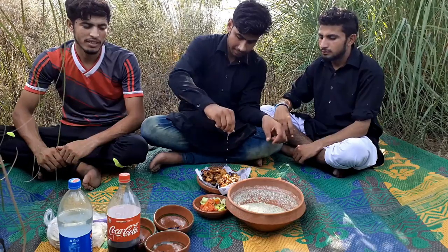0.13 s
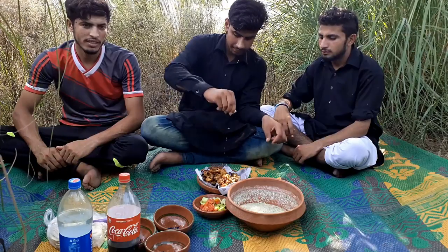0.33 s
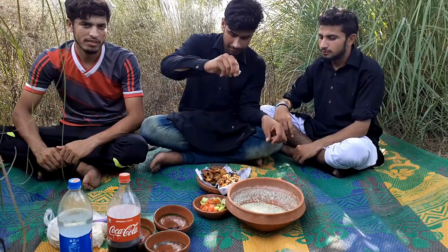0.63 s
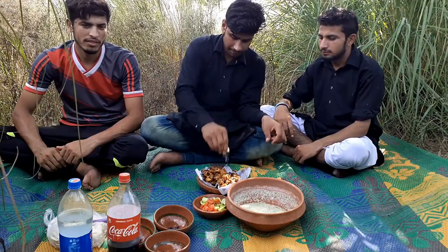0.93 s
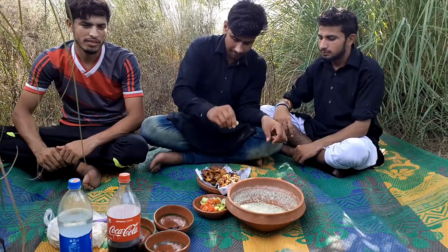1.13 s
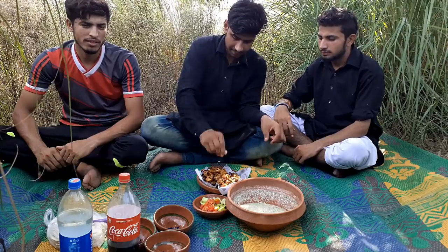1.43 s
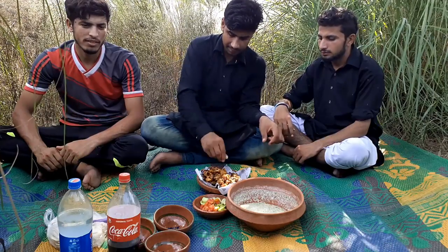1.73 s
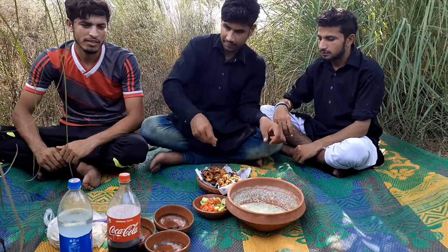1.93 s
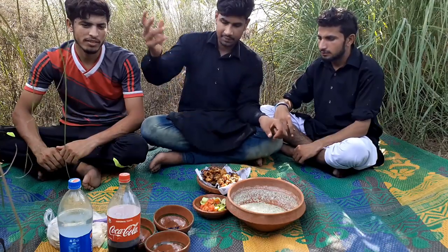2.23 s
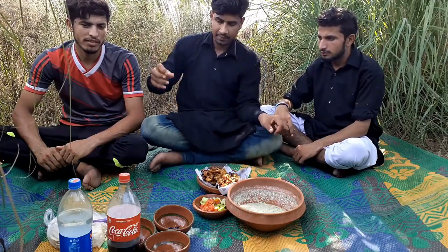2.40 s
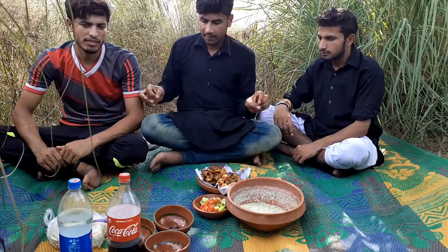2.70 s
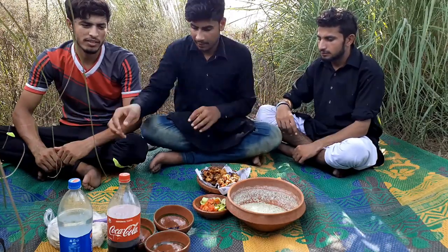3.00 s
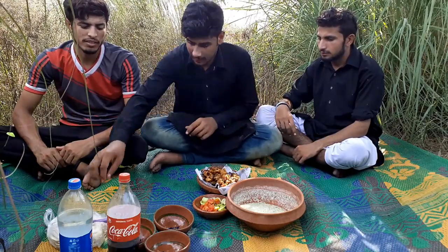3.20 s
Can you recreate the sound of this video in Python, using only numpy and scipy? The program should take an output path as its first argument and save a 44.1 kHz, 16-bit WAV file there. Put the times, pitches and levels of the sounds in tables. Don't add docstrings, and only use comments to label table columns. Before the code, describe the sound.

Two rough crow caws about two seconds apart, with a far single-cylinder engine chugging behind.

```python
import sys
import numpy as np
from scipy import signal
from scipy.fft import rfft, irfft
from scipy.io import wavfile
from scipy.ndimage import uniform_filter1d

SR = 44100
rng = np.random.default_rng(int(sys.argv[2]) if len(sys.argv) > 2 else 0)


def volts_from_decibels(level):
    exponent = np.asarray(level, float) / 20
    return 10 ** exponent


def inscribe(sig):
    pcm = np.round(np.clip(np.atleast_2d(sig).T, -1, 1) * 32767)
    wavfile.write(sys.argv[1], SR, pcm.astype(np.int16))


N = 147735

# (time [s], level [dB], pitch [Hz], beak opening [scale of the resonances])
FIRST_CAW = [
    (0, -37, 520, 1.0),
    (.04, -32, 505, 1.02),
    (.17, -30, 505, 1.0),
    (.23, -31.5, 472, .98),
    (.33, -33, 442, 1.0),
    (.375, -35, 410, .96),
    (.405, -39, 355, .86),
    (.422, -48, 308, .75),
    (.44, -68, 290, .72),
]
SECOND_CAW = [
    (2.262, -72, 440, .8),
    (2.3, -44, 455, .86),
    (2.345, -35, 455, .92),
    (2.4, -32.5, 512, .97),
    (2.5, -33, 480, 1.0),
    (2.62, -34.5, 440, 1.06),
    (2.69, -36, 405, 1.03),
    (2.718, -43, 350, .86),
    (2.755, -64, 300, .75),
]
# (centre [Hz], width [Hz], level [dB])
THROAT = [(646, 210, -11), (1080, 67, -25.5), (1418, 565, -8), (1970, 810, 0), (2222, 630, 0.5),
          (2960, 190, -15.5), (4350, 1650, -19), (6280, 3430, -24)]
# (time [s], exhaust pop [dB], intake thump [dB], valve rattle [dB])
FIRINGS = [(0.065, -34.5, -36, -73), (0.201, -40.5, -39, -78), (0.341, -36, -34, -78),
           (0.478, -45.5, -39, -66.5), (0.619, -40, -39.5, -77), (0.761, -39.5, -38, -73),
           (0.899, -41, -38.5, -66), (1.036, -38, -36.5, -72), (1.174, -39.5, -38.5, -76),
           (1.31, -39.5, -41.5, -92), (1.448, -41.5, -40, -74), (1.586, -40.5, -43, -77),
           (1.724, -41.5, -36, -73), (1.863, -42.5, -39.5, -94), (2.005, -41.5, -40, -69.5),
           (2.137, -44.5, -35.5, -70), (2.274, -42, -42.5, -66.5), (2.407, -35.5, -34.5, -56),
           (2.542, -37, -34.5, -55.5), (2.674, -40.5, -35, -58.5), (2.808, -50.5, -38.5, -67),
           (2.94, -43, -44, -63.5), (3.07, -39, -38.5, -74), (3.205, -40.5, -38.5, -82),
           (3.339, -37.5, -42, -80)]
# (delay [s], level [dB])
POP_ECHOES = [(.019, -12.5), (0.033, -16), (0.05, -14), (0.074, -26), (0.089, -18)]
# (frequency [Hz], density [dB per Hz])
RUMBLE = [(15, -54), (25, -35.5), (63, 9.5), (108, -4.5), (243, -6.5), (321, -14), (413, -55.5), (600, -17),
          (780, -67.5), (1320, -120)]
# (centre [Hz], width [Hz], level [dB], pulse rate [1/s], throb [dB], left over right [dB])
INSECTS = [
    (6780, 200, -69.5, 75, 2.0, -4),
    (8000, 500, -73.5, 56, 1.8, -2),
    (10600, 600, -84, 60, 1.0, 0),
]
# (frequency [Hz], density [dB per Hz])
RUSTLE = [(240, -29), (400, -7.5), (720, -11.5), (1800, -8.5), (3200, -14.5), (5700, -12), (7000, -3.5),
          (9600, -13.5), (13500, -9.5), (15700, -9)]
# (time [s], level [dB])
TWIG_TICKS = [
    (1.36, -66),
    (2.918, -47.5),
    (3.259, -66),
]

CROW_LEFT_DB, CROW_LEAD_SAMPLES = -3.2, 4.0
ENGINE_LEFT_DB, ENGINE_LEAD_SAMPLES = -7, 18.0
SMALL_LEFT_DB, SMALL_LEAD_SAMPLES = -5, 13.6


def rms_one(x):
    return x / np.sqrt(np.mean(x ** 2) + 1e-20)


def energy_one(x):
    return x / np.sqrt(np.sum(x ** 2, axis=1, keepdims=True))


def seconds():
    return np.arange(N) / SR


def drift(rate_hz):
    knots_s = np.arange(-2, N / SR * rate_hz * 2 + 2) / (2 * rate_hz)
    return rms_one(np.interp(seconds(), knots_s, rng.standard_normal(len(knots_s))))


def band(x, low_hz, high_hz, order=2):
    return signal.sosfilt(signal.butter(order, [low_hz, high_hz], "band", fs=SR, output="sos"), x)


def resonate(x, hz, width_hz):
    r = np.exp(-np.pi * width_hz / SR)
    zeros = np.array([1, 0, -1]) * (1 - r * r) / 2
    poles = [1, -2 * r * np.cos(2 * np.pi * hz / SR), r * r]
    return signal.lfilter(zeros, poles, x)


def ear_gains(left_db):
    return volts_from_decibels([[left_db / 2], [-left_db / 2]])


def place(x, left_db, lead_samples):
    delay = np.exp(-1j * np.pi * lead_samples * np.arange(N + 1) / N)
    late = irfft(rfft(x, 2 * N) * delay)[:N]
    return np.array([x, late]) * ear_gains(left_db)


def banded_noise(spectrum, patchy_db, rate_hz):
    hz, db = np.transpose(spectrum)
    edges_hz = np.geomspace(max(hz[1] * .7, 20), min(hz[-1] * 1.3, 19000), num=18)
    white = rng.standard_normal((2, N))
    together = drift(rate_hz / 4)
    out = np.zeros(N)
    for k, (low_hz, high_hz) in enumerate(zip(edges_hz, edges_hz[1:])):
        level_db = np.interp(np.log(low_hz * high_hz) / 2, np.log(hz), db)
        flicker_db = patchy_db * (together + drift(rate_hz))
        out += volts_from_decibels(level_db + flicker_db) * band(white[k % 2], low_hz, high_hz)
    return rms_one(out)


def caw(rows):
    jitter, gain_db = .008, 1.5
    rasp_hz, rasp_wobble, rasp_depth, rasp_bend = 78, .12, .22, .03
    breath_hz, breath_share, breath_rise = 170, .45, .09
    s, db, hz, beak = np.transpose(rows)
    part = slice(int(s[0] * SR), int(s[-1] * SR))
    t = seconds()[part]
    smooth_hz = np.interp(t, s, hz)
    rasp = 2 * np.pi * np.cumsum(rasp_hz * (1 + rasp_wobble * drift(25)[part])) / SR
    pitch_hz = smooth_hz * (1 + jitter * drift(60)[part] + rasp_bend * np.cos(rasp))
    k = np.arange(1, 27)[:, None]
    phase = 2 * np.pi * k * np.cumsum(pitch_hz) / SR + rng.uniform(0, 2 * np.pi, k.shape)

    seen_hz = k * smooth_hz / np.interp(t, s, beak)
    power = sum(volts_from_decibels(2 * d) / (1 + (2 * (seen_hz - f) / w) ** 2) ** 2 for f, w, d in THROAT)
    weight = np.sqrt(power)

    white = rng.standard_normal((2, len(k), SR // 2 + 500))
    slow = signal.sosfilt(signal.butter(3, breath_hz, fs=SR, output="sos"), white)
    blur = rms_one(slow[:, :, -len(t):]) / np.sqrt(2)
    share = np.clip(breath_share + breath_rise * (k - 4) + (k == 1), .42, .97)
    share = share * np.clip((smooth_hz - 300) / 120, .15, 1)
    in_phase = np.sqrt(1 - share) + np.sqrt(share) * blur[0]
    partials = in_phase * np.cos(phase) + np.sqrt(share) * blur[1] * np.sin(phase)

    voice = np.sum(weight * partials, axis=0) * np.sqrt(2 / np.sum(weight ** 2, axis=0))
    out = np.zeros(N)
    out[part] = voice * (1 + rasp_depth * np.sin(rasp)) * volts_from_decibels(np.interp(t, s, db) + gain_db)
    return out


def field(x):
    t60_s, level_db, low_hz, high_hz = .22, -14.5, 1200, 2800
    t = np.arange(SR // 2) / SR
    tails = energy_one(rng.standard_normal((2, len(t))) * volts_from_decibels(-60 * t / t60_s) * (t > .004))
    wet = signal.fftconvolve(x[None], tails, axes=1)[:, :N]
    return volts_from_decibels(level_db) * band(wet, low_hz, high_hz, order=1)


def crow():
    split_hz, scatter_s = 3600, .015
    x = caw(FIRST_CAW) + caw(SECOND_CAW)
    low = place(band(x, 800, split_hz * 0.86, order=3), CROW_LEFT_DB, CROW_LEAD_SAMPLES)
    t = np.arange(2500) / SR
    stalks = energy_one(rng.standard_normal((2, len(t))) * np.exp(-t / scatter_s))
    stalks = stalks * ear_gains(CROW_LEFT_DB)
    high = band(x, split_hz * 1.18, 11000, order=3)
    high = signal.fftconvolve(high[None], stalks, axes=1)[:, :N]
    return low + high + field(x)


def puff(at_s, hz, spread_s, shape):
    t = seconds() - at_s
    return shape(2 * np.pi * hz * t) * np.exp(-.5 * (t / spread_s) ** 2)


def thumps_and_pops():
    thump_hz, thump_s, thump_lead_s = 103.4, 0.0082, 0.02523
    pop_hz, pop_s, pop_delay_s, pop_gain_db = 165, .0028, .0058, 4.5
    echo_spread_db = 2.5
    arrivals = [(0.00099, 0.0047)] + POP_ECHOES
    out = np.zeros(N)
    for s, pop_db, thump_db, _ in FIRINGS:
        chance = rng.standard_normal(8)
        hz = thump_hz * (1 + 0.07 * chance[0])
        out -= volts_from_decibels(thump_db) * puff(s - thump_lead_s, hz, thump_s, np.cos)
        for k, (lag_s, db) in enumerate(arrivals):
            level_db = pop_db + pop_gain_db + db + echo_spread_db * (k > 0) * chance[k + 1]
            out -= volts_from_decibels(level_db) * puff(s + pop_delay_s + lag_s, pop_hz * (1 + 0.11 * k), pop_s, np.sin)
    return out


def valve_rattle():
    length_s, high_db, most_db = .035, 1.5, -70
    envelope = np.zeros(N)
    for s, _, _, db in FIRINGS:
        envelope += volts_from_decibels(min(db, most_db)) * np.exp(-.5 * ((seconds() - s) / length_s * 2) ** 2)
    noise = rng.standard_normal((2, N))
    low = rms_one(band(noise[0], 1700, 2600))
    high = rms_one(band(noise[1], 4600, 9000))
    return envelope * (low + volts_from_decibels(high_db) * high)


def rumble():
    level_db, swell_db, decay_s = -49, 7.5, 0.038
    swell = np.zeros(N)
    for s, *_ in FIRINGS:
        t = seconds() - s
        swell += (t > 0) * np.exp(-np.abs(t) / decay_s)
    gain = volts_from_decibels(level_db + swell_db * (uniform_filter1d(swell, size=300) - swell.mean()))
    return [gain * banded_noise(RUMBLE, patchy_db=-1.5, rate_hz=10.0) for _ in range(2)]


def engine():
    alike = .78
    mid, side = rumble()
    common = thumps_and_pops() + valve_rattle() + np.sqrt(alike) * mid
    apart = np.sqrt(1 - alike) * band(side, 160, 670, order=1) * [[1], [-1]]
    return place(common, ENGINE_LEFT_DB, ENGINE_LEAD_SAMPLES) + apart * ear_gains(ENGINE_LEFT_DB)


def insects():
    out = np.zeros((2, N))
    for hz, width_hz, db, rate_hz, throb_db, left_db in INSECTS:
        gate = np.cos(np.pi * np.cumsum(rate_hz * (1 + .1 * drift(5.6))) / SR) ** 4
        scrape = rng.standard_normal((3, N)) * (.8 + gate)
        ears = .5 * scrape[0] + scrape[1:]
        buzz = resonate(resonate(ears, hz, width_hz), hz, width_hz * 2)
        level_db = db + throb_db * (.8 * drift(18) + .3 * drift(3))
        out += rms_one(buzz) * volts_from_decibels(level_db) * ear_gains(left_db)
    return out


def grass():
    level_db, left_db = -62.5, -3
    rustle = np.array([banded_noise(RUSTLE, patchy_db=.8, rate_hz=6.0) for _ in range(2)])
    return rustle * volts_from_decibels(level_db) * ear_gains(left_db)


def twig():
    decay_s, ring_hz, ring_width_hz = .002, 4430, 900
    t, envelope = seconds(), np.zeros(N)
    for s, db in TWIG_TICKS:
        envelope += volts_from_decibels(db) * (t > s) * np.exp(-np.abs(t - s) / decay_s)
    snap = envelope * rng.standard_normal(N)
    return band(snap, 900, 15000, order=1) + 2.0 * resonate(snap, ring_hz, ring_width_hz)


def dove():
    start_s, length_s, hz, sag_hz, level_db = 3.2, .11, 570, 40, -70
    u = np.clip((seconds() - start_s) / length_s, 0, 1)
    tone = np.sin(2 * np.pi * np.cumsum(hz - sag_hz * u ** 2) / SR)
    return volts_from_decibels(level_db) * np.sqrt(np.sin(np.pi * u) + 1e-12) * tone


def knock():
    start_s, rise_s, hz, width_hz, level_db = 3.338, 0.0083, 1150, 440, -58.5
    rise = np.clip((seconds() - start_s) / rise_s, 0, 1)
    return volts_from_decibels(level_db) * rise * rms_one(resonate(rng.standard_normal(N), hz, width_hz))


def scene():
    small = place(twig() + dove() + knock(), SMALL_LEFT_DB, SMALL_LEAD_SAMPLES)
    return crow() + engine() + insects() + grass() + small


def top_cut(x):
    return signal.sosfilt(signal.butter(12, 16340, fs=SR, output="sos"), x)


def record(dry):
    mic_low_hz, cutoff_hz = 45, 15900
    mix = signal.sosfilt(signal.butter(1, mic_low_hz, "high", fs=SR, output="sos"), dry)
    mix = signal.sosfilt(signal.cheby2(16, 60, cutoff_hz, fs=SR, output="sos"), mix)
    return top_cut(mix)


dry = scene()
out = record(dry)
inscribe(out)
```